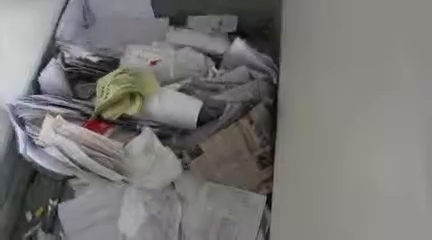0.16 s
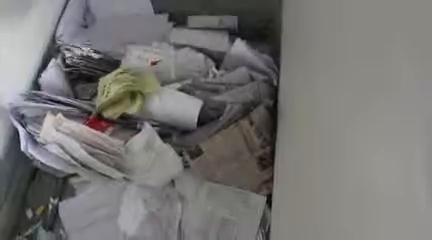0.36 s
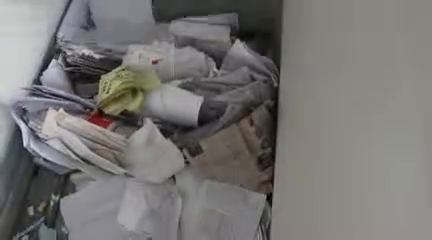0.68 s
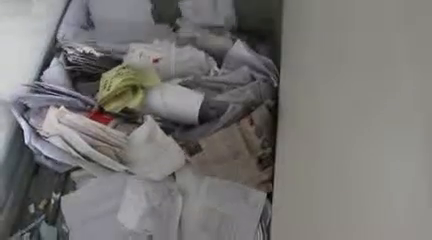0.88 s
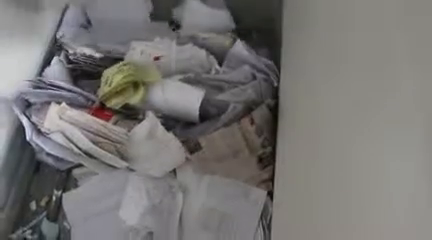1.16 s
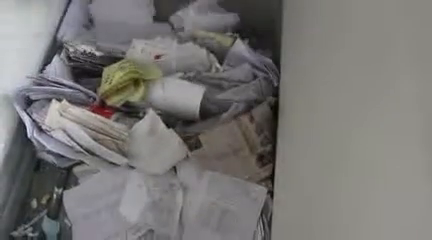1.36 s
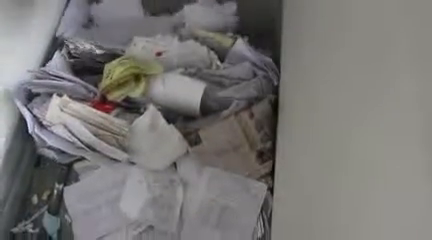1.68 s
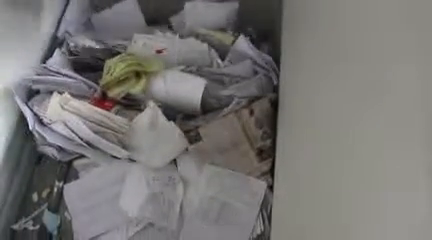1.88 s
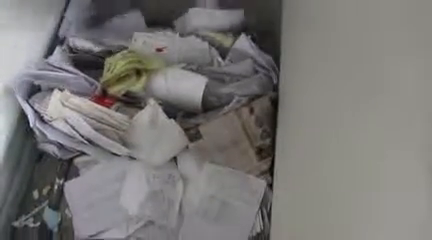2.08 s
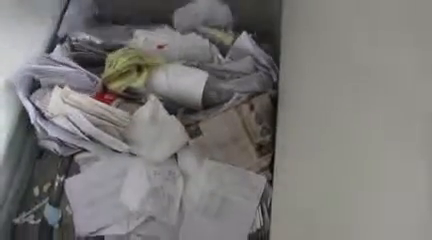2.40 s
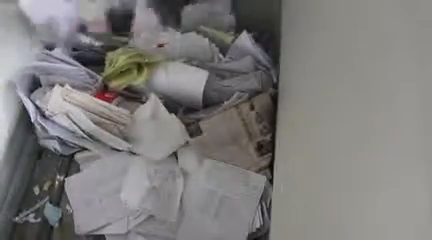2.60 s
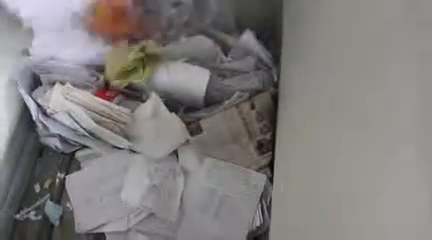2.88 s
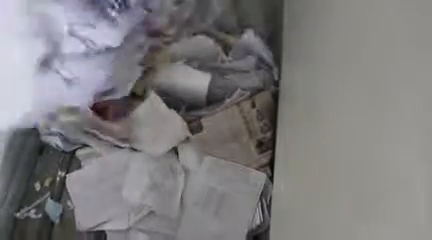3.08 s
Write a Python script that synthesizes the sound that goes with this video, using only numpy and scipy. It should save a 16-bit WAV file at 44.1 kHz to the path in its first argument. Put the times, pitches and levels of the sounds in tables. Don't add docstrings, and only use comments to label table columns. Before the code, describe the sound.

A heavy industrial paper shredder runs without pause, crunching paper about eight times a second over a low droning steel housing, with rips, snaps and faint high squeals; close stereo microphone in a hall, leaning left.

```python
import sys
import numpy as np
from scipy import signal
from scipy.fft import rfft, irfft, next_fast_len
from scipy.io import wavfile
from scipy.ndimage import uniform_filter1d, map_coordinates

SR = 44100
rng = np.random.default_rng(int(sys.argv[2]) if len(sys.argv) > 2 else 0)


def dump(signal):
    limited = np.clip(np.atleast_2d(signal).T, -1, 1)
    pcm = np.round(limited * 32767).astype(np.int16)
    wavfile.write(sys.argv[1], SR, pcm)


def how_loud(loudness_db):
    steps = np.asarray(loudness_db, float) / 20
    return 10 ** steps


N = 143325

# [t/s, crunch level/dB, hold/s, housing shake level/dB]
TOOTH_BITES = [(0.0, -26, 0.032, -19), (0.258, -30.5, 0.014, -49), (0.302, -30, 0.069, -14.5),
               (0.397, -27, 0.05, -37), (0.584, -26, 0.021, -15), (0.624, -24.5, 0.06, -30),
               (0.772, -32, 0.068, -21), (0.836, -36, 0.082, -19.5), (0.918, -31, 0.1, -18),
               (1.071, -29, 0.023, -18), (1.147, -29, 0.096, -17), (1.321, -32, 0.063, -18),
               (1.449, -27, 0.039, -16), (1.51, -30, 0.046, -25), (1.621, -26.5, 0.044, -15),
               (1.672, -30, 0.11, -23), (1.853, -28.5, 0.069, -19), (1.936, -30, 0.043, -20),
               (2.065, -30.5, 0.022, -17.5), (2.127, -25.5, 0.073, -15.5), (2.17, -40, 0.094, -29),
               (2.33, -32, 0.037, -17), (2.42, -27, 0.07, -14), (2.498, -28, 0.024, -20),
               (2.571, -26.5, 0.077, -18), (2.698, -26, 0.033, -18), (2.806, -32.5, 0.15, -21.5),
               (3.076, -26, 0.028, -16.5), (3.138, -26.5, 0.013, -23.5), (3.178, -26.5, 0.118, -22)]
# [f/Hz, level/dB]
SCRAPE_SPECTRUM = [(2500, -30), (4600, 0.5), (6600, -1), (7200, -3.5), (9000, -3.5), (10200, -13)]


def unit(x):
    return x / np.sqrt(np.mean(x ** 2) + 1e-20)


def along(points, hz):
    f, v = np.transpose(points)
    return np.interp(np.log(hz + 1), np.log(f + 1), v)


def wobble(rate):
    knots = rng.standard_normal(int(N * rate / SR) + 4)
    return map_coordinates(knots, [np.arange(N) * rate / SR])


def filtered(x, response):
    m = next_fast_len(N + SR // 2)
    f = np.fft.rfftfreq(m, 1 / SR)
    return irfft(rfft(x, m) * response(f), m)[..., :N]


def peaks(modes, f):
    power = 0
    for centre, width, db in modes:
        damping = (f * width) ** 2
        power = power + how_loud(2 * db) * damping / ((centre * centre - f * f) ** 2 + damping)
    return np.sqrt(power)


def gritty(rate, spread_db):
    size = how_loud(spread_db * rng.exponential(size=int(N * rate / SR) + 2))
    envelope = np.interp(np.arange(N) * rate / SR, np.arange(len(size)), size)
    return unit(rng.standard_normal((2, N)) * envelope)


def patchy(x, depth_db):
    z = signal.stft(x, nperseg=512)[2]
    field = uniform_filter1d(rng.standard_normal(z.shape[1:]), size=3, axis=0)
    field = uniform_filter1d(field, size=5, axis=1)
    return signal.istft(z * how_loud(depth_db * unit(field)), nperseg=512)[1][:, :N]


def swells(times, peaks_db, rise_s, holds_s, fade_s, floor_db):
    t = np.arange(N) / SR - np.asarray(times)[:, None]
    rise = np.clip(t / rise_s + .5, 0, 1)
    fade = np.exp(-np.clip(t - np.reshape(holds_s, (-1, 1)), 0, None) / fade_s)
    power = (how_loud(2 * peaks_db)[:, None] * rise * fade).sum(0)
    return np.sqrt(how_loud(2 * floor_db) + power)


def teeth():
    # [f/Hz, level/dB]
    crunch_spectrum = [(200, -23.5), (520, 0), (1000, -3.5), (1300, -5), (3000, -6.5), (4200, -14.5),
                       (5000, -19.5), (10500, -41)]
    s, db, hold, _ = np.transpose(TOOTH_BITES)
    level = swells(s, db + 1.5, rise_s=.011, holds_s=hold, fade_s=.021, floor_db=-29)
    tears = patchy(gritty(1100, spread_db=1.4), depth_db=1.3)
    crunch = unit(filtered(tears, lambda f: how_loud(along(crunch_spectrum, f))))
    flutter_db = .5 * wobble(45)
    return level * how_loud(flutter_db) * crunch


def housing():
    # [f/Hz, width/Hz, level/dB]
    housing_modes = [(61.6, 8.7, -7.5), (124.7, 14, -1.5), (145.5, 16, -2.5), (175.4, 11.5, -1.5),
                     (195, 8.8, -5.5), (230, 10.8, -1), (258, 29, -3.5), (292.4, 19, -1), (314, 10.3, -1.5),
                     (353.3, 21, -6.5), (430.5, 32, -11.5), (571, 27, -12), (917, 14, -12),
                     (968, 31, -10.5)]
    # [f/Hz, level/dB]
    frame_response = [(25, -59), (48, -35), (95, -18), (120, -12.5), (330, -22.5), (460, -30.5),
                      (1000, -22), (1500, -45.5)]
    s, _, hold, shake_db = np.transpose(TOOTH_BITES)
    drive = swells(s, shake_db - 7, rise_s=0.046, holds_s=hold, fade_s=0.048, floor_db=-25.5)

    def body(f):
        modes = peaks(housing_modes, f) / (1 + (f / 1100) ** 6)
        return np.hypot(modes, how_loud(along(frame_response, f)))

    return drive * unit(filtered(gritty(150, spread_db=0.36), body))


def gears():
    # [multiple, rms level/dB]
    mesh_harmonics = [
        (1, -39.5),
        (2, -39.5),
        (5, -50),
    ]
    mesh_hz, waver, swing_db = 149.8, 0.01367, 3.5
    turns = np.cumsum(mesh_hz * (1 + waver * wobble(6))) / SR
    tone = np.zeros(N)
    for multiple, db in mesh_harmonics:
        level = np.sqrt(2) * how_loud(db + swing_db * wobble(8.25))
        tone += level * np.sin(2 * np.pi * (multiple * turns + rng.random()))
    return np.array([tone, np.roll(tone, SR // 3)])


def disc():
    # [t/s, singing level/dB, scraping level/dB]
    disc_rubs = [(0.0, -42, -52), (0.02, -38, -51), (0.04, -45.5, -54.5), (0.32, -36, -50.5),
                 (0.37, -41.5, -49.5), (0.62, -41.5, -51), (0.85, -49, -60), (0.96, -45.5, -51.5),
                 (1.14, -40.5, -51), (1.55, -37, -49.5), (1.57, -40, -53), (1.64, -40, -52.5),
                 (1.73, -41.5, -48.5), (2.04, -52, -57), (2.39, -41, -45), (3.03, -45, -51.5),
                 (3.09, -39, -49), (3.25, -45, -51)]
    # [f/Hz, width/Hz, level/dB]
    disc_modes = [(5620, 440, -3.5), (5670, 55, 1.5), (5710, 40, -9), (5800, 54, -2.5), (5495, 35, -3),
                  (7910, 92, -7.5), (7880, 390, -6), (3920, 240, -1.5), (4150, 60, -3), (6580, 450, -9),
                  (7100, 40, -9)]
    s, sing_db, scrape_db = np.transpose(disc_rubs)
    t = np.arange(N) / SR
    sing_level = how_loud(np.interp(t, s, sing_db) + 3 + 1.1 * wobble(17))
    scrape_level = how_loud(np.interp(t, s, scrape_db) + 9.5 + 1.3 * wobble(39.93))
    sing = unit(filtered(gritty(300, spread_db=0.1), lambda f: peaks(disc_modes, f) ** 1.53))
    scrape = unit(filtered(gritty(700, spread_db=2.0), lambda f: how_loud(along(SCRAPE_SPECTRUM, f))))
    return sing * sing_level + scrape * scrape_level


def sheets():
    # [t/s, peak level/dB]
    sheet_snaps = [(0.006, -27), (0.25, -24.5), (0.588, -25.5), (0.6843, -34), (0.9453, -25), (0.9877, -27),
                   (1.0261, -31), (1.3084, -37), (1.3887, -28), (1.4466, -26), (1.752, -29), (1.801, -26),
                   (2.156, -25), (2.2074, -33), (2.5825, -16.5), (2.6883, -37), (3.0829, -38)]
    s, db = np.transpose(sheet_snaps)
    t60_s = 0.07
    level = swells(s, db - 8.5, rise_s=.0015, holds_s=0.0005, fade_s=t60_s / np.log(1e6), floor_db=-120)
    noise = rng.standard_normal((2, N))
    return level * unit(filtered(noise, lambda f: how_loud(along(SCRAPE_SPECTRUM, f))))


def jolts():
    # [t/s, f/Hz, rms level/dB, length/s]
    wad_jolts = [(0.041, 312.2, -26.5, 0.054), (0.043, 140.0, -20, 0.033), (0.046, 263.8, -26.5, 0.074),
                 (0.065, 150.7, -22, 0.086), (0.35, 131.9, -24.5, 0.22), (0.606, 142.7, -27, 0.064),
                 (0.613, 298.8, -25, 0.17), (0.657, 175.0, -26, 0.18), (0.67, 226.1, -25.3, 0.047),
                 (0.935, 301.5, -23.5, 0.062), (0.944, 576.0, -29.7, 0.1), (0.97, 140.0, -25.5, 0.06),
                 (1.01, 177.6, -26, 0.125), (1.075, 573.3, -29.5, 0.13), (1.076, 131.9, -20, 0.048),
                 (1.094, 223.4, -24.4, 0.039), (1.122, 129.2, -26.5, 0.19), (1.328, 309.5, -23.3, 0.065),
                 (1.388, 140.0, -20.5, 0.053), (1.4, 175.0, -27, 0.19), (1.455, 164.2, -19.5, 0.04),
                 (1.483, 218.0, -26.5, 0.05), (1.544, 169.6, -25.0, 0.045), (1.549, 296.1, -22.0, 0.06),
                 (1.65, 309.5, -27.5, 0.12), (1.705, 150.7, -20, 0.054), (1.8, 148.0, -23.5, 0.14),
                 (1.913, 296.1, -26, 0.098), (1.918, 118.4, -24, 0.047), (1.948, 312.2, -24.5, 0.044),
                 (1.952, 150.7, -19.5, 0.057), (1.964, 215.3, -24.5, 0.1), (2.036, 148.0, -22, 0.059),
                 (2.1, 242.2, -26, 0.06), (2.163, 290.7, -27.5, 0.085), (2.168, 226.1, -25, 0.071),
                 (2.355, 290.7, -23.5, 0.098), (2.474, 290.7, -21, 0.07), (2.531, 131.9, -24.5, 0.066),
                 (2.599, 296.1, -21, 0.045), (2.648, 177.6, -28, 0.18), (2.673, 296.1, -23.5, 0.08),
                 (2.728, 263.8, -20, 0.075), (2.745, 317.6, -25.5, 0.11), (2.932, 314.9, -26.5, 0.19),
                 (2.954, 158.8, -26.5, 0.09), (3.158, 172.3, -26, 0.24), (3.19, 290.7, -24.5, 0.093),
                 (0.383, 575, -33, 0.21), (0.313, 960, -36.5, 0.11), (.05, 965, -37, 0.18),
                  (0.834, 700, -34.5, 0.11), (1.095, 743, -35.5, 0.25), (1.0, 965, -38.5, 0.21),
                  (1.33, 970, -36.5, 0.11), (1.5, 950, -37.5, 0.086), (1.84, 915, -35.5, 0.13),
                  (2.15, 840, -37, 0.11), (2.45, 745, -33, .12), (3.12, 740, -37, 0.22),
                  (3.1, 830, -36, .1), (.8, 262, -26, .1), (.39, 316, -26, .08), (1.19, 268, -27, .08),
                  (.337, 225, -25, .05), (2.6, 1030, -33, .09), (1.68, 980, -35, .12)]
    s, hz, db, length = np.transpose(wad_jolts)[:, :, None]
    t = np.arange(N) / SR
    bent_time = np.cumsum(1 + 0.0157 * wobble(15)) / SR
    swell = np.sqrt(2) * how_loud(db + 0.5) * np.exp(-(2 * (t - s) / length) ** 2)
    start = rng.random((len(s), 2)).T[:, :, None]
    phase = 2 * np.pi * (hz * bent_time + start)
    return (swell * np.sin(phase)).sum(1)


def rips():
    # [t/s, peak level/dB, centre f/Hz]
    sheet_rips = [(0.1913, -21, 1860), (0.2275, -20, 3850), (0.2968, -18, 2520), (0.5875, -15, 2440),
                  (0.712, -24, 1680), (0.8774, -22, 1440), (0.9587, -17, 1440), (1.0879, -18, 1980),
                  (1.1506, -21, 2370), (1.321, -15.5, 2380), (1.3468, -12.5, 2690), (1.4024, -18.5, 2560),
                  (1.4462, -18, 3340), (1.5589, -25, 2470), (1.617, -19, 1690), (1.633, -14.5, 3040),
                  (1.8738, -21, 2580), (1.943, -22, 2050), (2.0642, -21, 2750), (2.129, -17, 1660),
                  (2.183, -17, 1540), (2.287, -20, 1540), (2.421, -21, 1470), (2.4504, -18, 1750),
                  (2.581, -14, 2290), (2.696, -19, 3040), (2.832, -12, 1750), (2.9612, -18, 1670),
                  (3.0215, -23, 2070), (3.0622, -21, 2670), (3.0808, -17, 1440), (3.1304, -15, 1750),
                  (3.1835, -16.5, 1500)]
    t60_s, relative_width = .07, 0.24
    out = np.zeros((2, N + SR))
    t = np.arange(SR // 10) / SR
    f = np.fft.rfftfreq(len(t), 1 / SR)
    for s, db, hz in sheet_rips:
        noise = rfft(rng.standard_normal((2, len(t))))
        burst = unit(irfft(noise * peaks([(hz, relative_width * hz, 0)], f), len(t)))
        onset = 1 - np.exp(-t / 0.0012)
        decay = how_loud(db - 10 - 60 * t / t60_s)
        start = round(s * SR)
        out[:, start:start + len(t)] += burst * decay * onset
    return out[:, :N]


def scene():
    # [f/Hz, correlation]
    likeness = [(60, 0.92), (170, 1), (480, 0.85), (1380, 0.63), (3910, 0.5), (11100, 0.12)]
    # [f/Hz, level/dB]
    left_lean = [(60, 3), (170, 4.5), (300, 5), (480, 4), (1380, 2), (3910, 2.5), (11100, 2)]

    def mid_side(f):
        angle = np.arccos(np.clip(along(likeness, f), -1, 1)) / 2
        return np.array([np.cos(angle), np.sin(angle)])

    def lean(f):
        return how_loud(along(left_lean, f) * 0.59 * np.array([[1], [-1]]))

    machine = teeth() + housing() + gears() + disc() + sheets() + jolts() + rips()
    mid, side = filtered(machine, mid_side)
    return filtered(np.array([mid + side, mid - side]), lean)


def top_cut(x):
    return signal.sosfilt(signal.butter(12, 11700, fs=SR, output="sos"), x)


def record(dry):
    # [f/Hz, level/dB]
    mic_response = [(20, -11), (50, 0.5), (10200, 0), (10600, -3), (10900, -16), (11700, -18)]
    mix = filtered(dry, lambda f: how_loud(along(mic_response, f)))
    return top_cut(mix)


dry = scene()
out = record(dry)
dump(out)
```